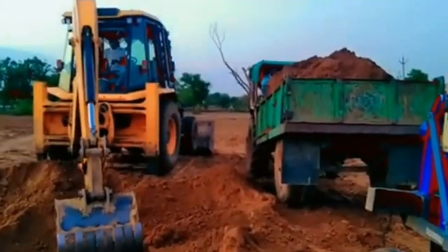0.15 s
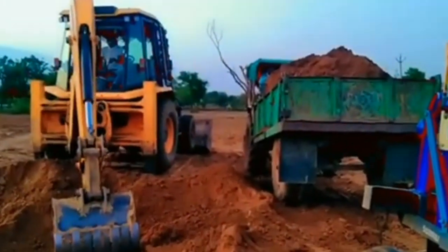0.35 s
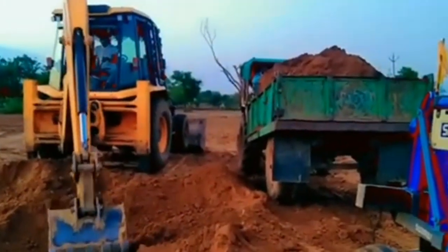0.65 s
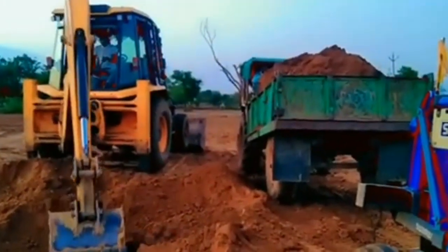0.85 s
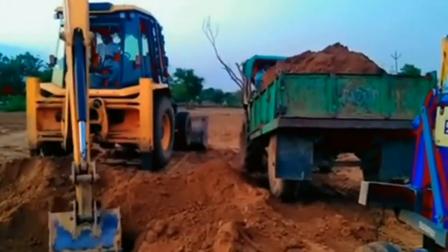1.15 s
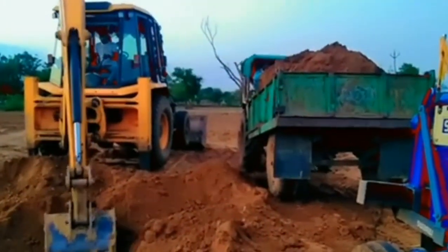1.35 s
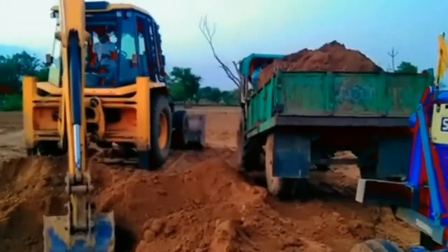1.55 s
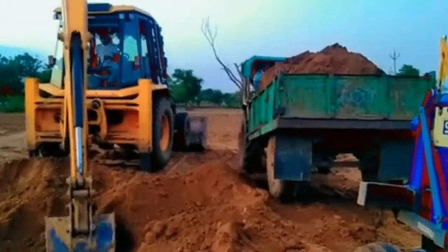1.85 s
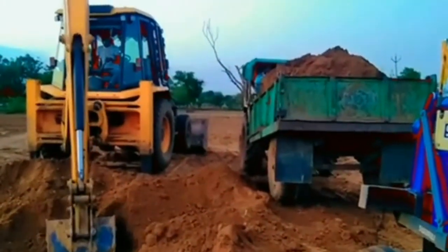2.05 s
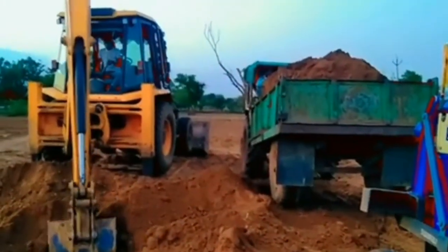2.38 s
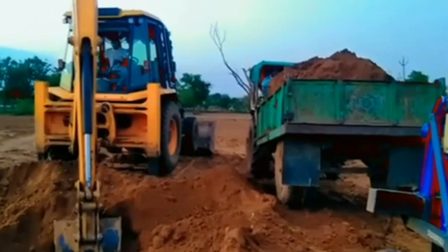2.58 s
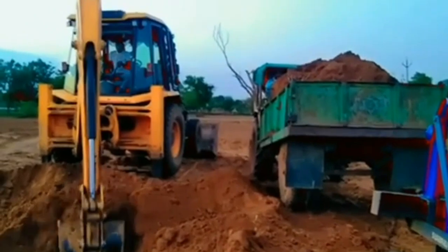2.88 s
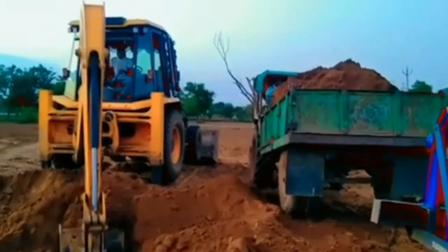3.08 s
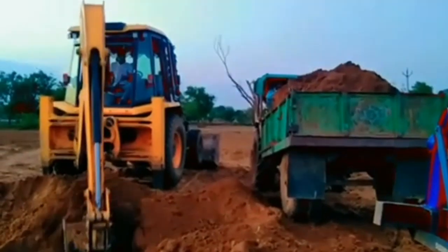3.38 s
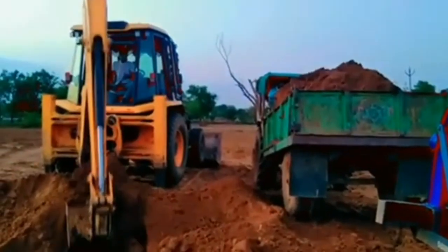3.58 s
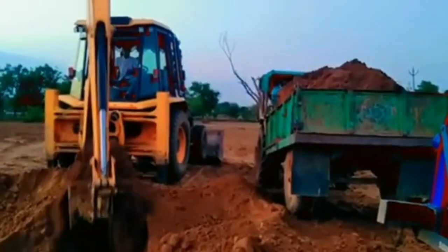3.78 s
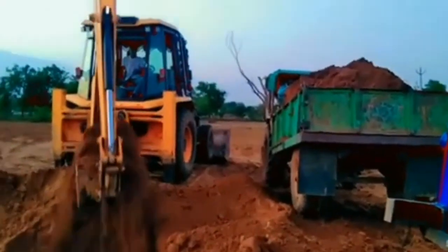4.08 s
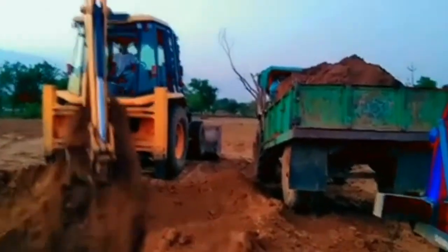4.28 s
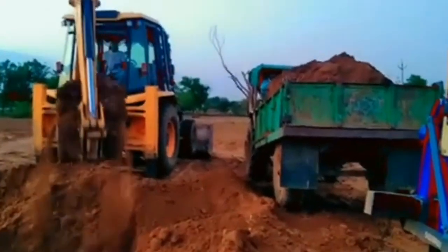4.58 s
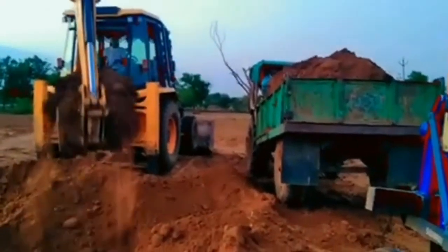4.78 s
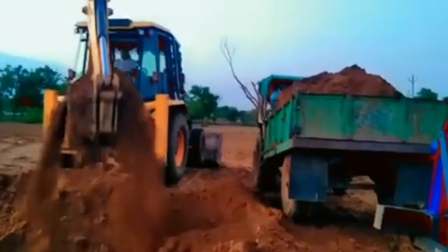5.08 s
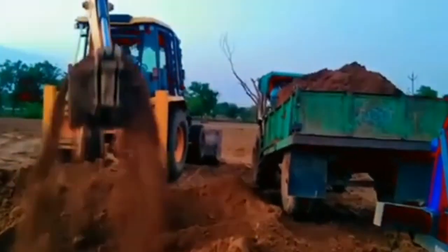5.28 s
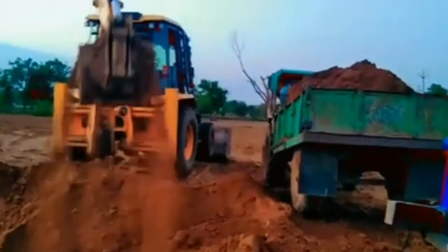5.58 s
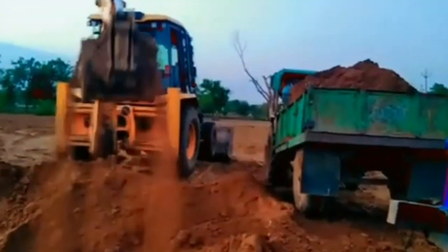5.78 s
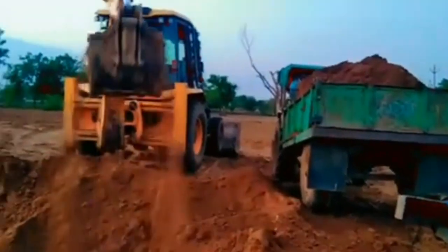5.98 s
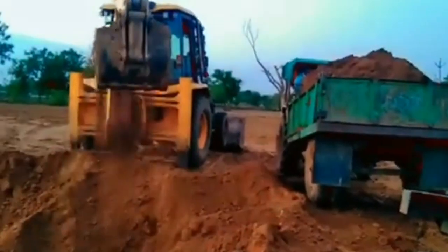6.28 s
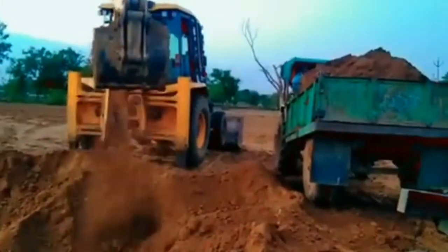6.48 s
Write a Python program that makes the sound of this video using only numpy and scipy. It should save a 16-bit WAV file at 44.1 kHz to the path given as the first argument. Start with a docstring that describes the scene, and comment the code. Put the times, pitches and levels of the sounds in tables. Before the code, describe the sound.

A diesel engine knocks at idle, revs up as a bucket bites dry earth, then stones snap and loaded steel bangs and rattles.

```python
"""A four-cylinder diesel knocks at idle, then revs up: a backhoe loader digs in dry earth in an open field.
Each firing shakes noise through block resonances, over the rushing noise of fan and exhaust.
Stones snap and squeal as the bucket curls: filtered impulses, grit grains and sliding narrow noise bands.
The hydraulics groan in rising rough overtones. Blows and rattle ring the lifted bucket's steel modes,
while spilling earth thuds as dull filtered grains and makes the shell boom."""
import sys
import numpy as np
from scipy import signal
from scipy.fft import rfft, irfft, next_fast_len
from scipy.io import wavfile

SR = 44100
rng = np.random.default_rng(int(sys.argv[2]) if len(sys.argv) > 2 else 0)


def dump(signal):
    """Clip the signal to [-1, 1] and save it as 16-bit WAV at the path in sys.argv[1]."""
    limited = np.clip(np.atleast_2d(signal).T, -1, 1)
    pcm = np.round(limited * 32767).astype(np.int16)
    wavfile.write(sys.argv[1], SR, pcm)


N = 292956
TIME = np.arange(N) / SR


def from_db(db):
    """Amplitude factor of a level in dB."""
    return 10 ** (np.asarray(db) / 20)


def rms_one(x):
    """Scale to rms 1."""
    return x / np.sqrt(np.mean(x ** 2) + 1e-20)


def in_time(rows):
    """Each column of a curve, at every sample."""
    s, *columns = np.transpose(rows)
    return [np.interp(TIME, s, c) for c in columns]


def noise():
    """White noise, rms 1."""
    return rng.standard_normal(N)


def drift(per_s):
    """Slow random variation, rms 1."""
    knots = rng.standard_normal(4096)
    return rms_one(np.interp(TIME * per_s, np.arange(len(knots)), knots))


def grains(per_s, spread_db):
    """Random contacts of uneven size; rms 1."""
    size_db = spread_db * np.minimum(rng.exponential(1, N), 4)
    sizes = from_db(size_db) * rng.choice([-1, 1], N)
    return rms_one(sizes * (rng.random(N) < per_s / SR))


def butterworth(x, order, edge_hz, kind="low"):
    """Butterworth filter."""
    return signal.sosfilt(signal.butter(order, edge_hz, kind, fs=SR, output="sos"), x)


def soften(x, edge_hz):
    """Steep low-pass: little is left above the edge."""
    return butterworth(x, 8, min(edge_hz, SR / 3))


def colour(x, spectrum):
    """Causal (minimum-phase) filter with the given spectrum; white noise keeps its level."""
    hz, db = np.transpose(spectrum)
    size = 2 * next_fast_len(N // 2 + 4096)
    grid_hz = np.maximum(np.arange(size // 2 + 1) * SR / size, 1)
    gain = rms_one(from_db(np.interp(np.log(grid_hz), np.log(hz), db)))
    # folding the cepstrum onto positive times makes the phase minimal
    cepstrum = irfft(np.log(gain))
    cepstrum[1:size // 2] *= 2
    cepstrum[size // 2 + 1:] = 0
    return irfft(rfft(x, size) * np.exp(rfft(cepstrum)))[:N]


def resonate(x, hz, width_hz):
    """One resonance with gain 1 on top."""
    r = np.exp(-np.pi * width_hz / SR)
    zeros = np.array([1, 0, -1]) * (1 - r * r) / 2
    poles = [1, -2 * r * np.cos(2 * np.pi * hz / SR), r * r]
    return signal.lfilter(zeros, poles, x)


def width_of(t60_s):
    """Bandwidth in Hz of a resonance that falls 60 dB in t60_s."""
    return np.log(1000) / (np.pi * t60_s)


def narrow_band(pitch_hz, width_hz, steady):
    """A rough tone on a moving pitch: a steady core with noise of a given width around it."""
    phase = 2 * np.pi * np.cumsum(pitch_hz) / SR
    in_phase = (steady + drift(width_hz)) * np.sin(phase)
    quadrature = drift(width_hz) * np.cos(phase)
    return rms_one(in_phase + quadrature)


def dying(start_s, decay_s):
    """A sudden start and an exponential decay."""
    return (TIME >= start_s) * np.exp(-np.abs(TIME - start_s) / decay_s)


def together(*levels):
    """Unrelated drives add in power."""
    return np.sqrt(sum(level ** 2 for level in levels))


def swells(rows, attack_s, release_s):
    """Each event rises to its level, holds and dies away; overlapping ones add in power."""
    power = 0
    for start_s, length_s, db, *_ in rows:
        rise = np.clip((TIME - start_s) / attack_s, 0, 1)
        fall = np.exp(-np.maximum(TIME - start_s - length_s, 0) / release_s)
        power = power + (from_db(db) * rise * fall) ** 2
    return np.sqrt(power)


# engine speed: (time [s], firing rate [1/s])
FIRING_RATE = [(0.0, 24.1), (0.4, 23.14), (1.45, 22.44), (2.3, 23.63), (2.6, 29.57), (3.2, 34.5),
               (3.5, 31.73), (3.8, 33.51), (4.3, 33.12), (5.4, 29.47), (6.64, 27.79)]
# engine effort, as strength of the combustion knock: (time [s], relative level [dB])
EFFORT_CURVE = [(0, -57.5), (.2, -56), (.55, -53), (.93, -52.5), (1.08, -56.5), (1.27, -52.5),
                (1.97, -52.5), (2.1, -61), (2.9, -55.5), (3.78, -51.5), (4.4, -52), (6.64, -58.5)]
# knock spectrum: (frequency [Hz], relative density [dB])
KNOCK_SPECTRUM = [(200, 0), (350, 2), (750, -9.5), (1050, 7), (1650, -12), (2100, 4.5), (2550, 0),
                  (3100, 2), (4000, -4), (4900, -5), (5700, -15), (7000, -36.5), (9500, -50.5)]
# ranges that ring with each firing: (frequency [Hz], width [Hz], relative level [dB])
FIRING_RINGS = [(1027, 290, -12.5), (2093, 126, 2), (2195, 85, 4.5), (3015, 220, -5), (3720, 580, -8.5)]
# fan and exhaust spectrum: (frequency [Hz], relative density [dB])
RUSH_SPECTRUM = [(200, 5.5), (290, 2.5), (480, -1.5), (780, -4), (1150, -7), (1700, -9.5), (2300, -7.5),
                 (3500, -2.5), (4900, -12), (5800, -22), (6800, -25.5), (8200, -38), (10000, -40),
                 (14000, -57)]
# block and panel resonances: (frequency [Hz], width [Hz], relative level [dB])
BLOCK_MODES = [(285, 73, -5.5), (334, 33, -9.5), (392.2, 4.5, 6.5), (977, 14, -5.5), (1184, 15, -6),
               (1730, 4, -2.5), (3128, 29, -1)]
# fine hiss pulsing at a fixed delay after each firing: (time [s], level [dB])
FINE_HISS = [(0, -93), (.55, -81), (2.25, -80.5), (2.53, -75.5), (2.68, -83.5), (3.9, -82), (4.4, -90)]
IDLE_FIRINGS_PER_S, RUSH_DB_AT_IDLE, RUSH_DB_PER_DOUBLING = 23, -53.5, 3.5
HISS_DELAY_S = .0395  # firing to strongest hiss


def engine(decay_turns=0.39, onset_turns=0.12, uneven_db=1.5, ring_uneven_db=1.0, block_db=9):
    """Every firing sets the block clattering for part of the cycle, over the rush of fan and exhaust."""
    (per_s,), (knock_db,), (hiss_db,) = in_time(FIRING_RATE), in_time(EFFORT_CURVE), in_time(FINE_HISS)
    rush_db = RUSH_DB_AT_IDLE + RUSH_DB_PER_DOUBLING * np.log2(per_s / IDLE_FIRINGS_PER_S)

    # one turn = one firing interval
    turn = np.cumsum(per_s) / SR - onset_turns + 1
    firing, since = turn.astype(int), turn % 1
    strength = from_db(uneven_db * rng.standard_normal(512)[firing])
    build_up = 1 - np.exp(-(since / .075) ** 2)
    burst = strength * build_up * np.exp(-since / decay_turns)

    jolts = from_db(knock_db) * rms_one(burst * grains(per_s=14000, spread_db=-1.5))
    knock = from_db(-4.0) * colour(jolts, KNOCK_SPECTRUM)
    rush = from_db(rush_db) * colour(noise(), RUSH_SPECTRUM)

    shaking = from_db(knock_db) * rms_one(burst * noise())
    rings = 0
    for hz, width_hz, db in FIRING_RINGS:
        # every firing shakes each range with a strength of its own
        drive = shaking * from_db(db + ring_uneven_db * rng.standard_normal(512)[firing])
        rings = rings + resonate(resonate(drive, hz, width_hz), hz, width_hz)

    steady = from_db(rush_db + 6.0) * noise()
    panels = sum(from_db(db) * resonate(steady, hz, width_hz) for hz, width_hz, db in BLOCK_MODES)
    body = from_db(block_db) * soften(panels + rings, edge_hz=6360)

    pulsed = np.cos(np.pi * (since - HISS_DELAY_S * per_s)) ** 2 * noise()
    hiss = from_db(hiss_db) * rms_one(butterworth(pulsed, 4, [5900, 8300], "band"))
    return knock + rush + body + hiss


# light metallic pings and ticks: (time [s], frequency [Hz], t60 [s], peak level [dB])
METAL_PINGS = [(.347, 2980, .05, -41.5), (.866, 7900, 0.0085, -54), (2.283, 4200, 0.059, -48),
               (5.784, 2070, 0.086, -29.5)]


def pings():
    """A small hard part is tapped and rings briefly at one pitch."""
    out = 0
    for s, hz, t60_s, db in METAL_PINGS:
        tone = np.sin(2 * np.pi * hz * (TIME - s))
        out = out + from_db(db) * dying(s, t60_s / np.log(1000)) * tone
    return out


# squeals of valves and of steel on stone:
# (time [s], length [s], start frequency [Hz], end frequency [Hz], level [dB])
SQUEAL_EVENTS = [(1.028, .21, 4200, 4000, -63), (4.461, 0.15, 2410, 2466, -46.5),
                 (4.567, 0.11, 2416, 2630, -50), (4.466, 0.24, 3820, 3800, -58),
                 (4.81, 0.17, 3080, 3050, -51.5), (5.17, 0.085, 3080, 3150, -46),
                 (5.2, 0.098, 3230, 3310, -53), (5.412, 0.17, 562, 629, -56), (5.43, 0.19, 2730, 2590, -53),
                 (5.48, 0.1, 3270, 3120, -49), (5.481, 0.11, 1070, 1100, -46)]


def squeals(width_hz=85):
    """One narrow resonance sings roughly for a moment, sliding a little."""
    out = np.zeros(N)
    for s, length_s, start_hz, end_hz, db in SQUEAL_EVENTS:
        done = np.clip((TIME - s) / length_s, 0, 1)
        pitch_hz = start_hz + (end_hz - start_hz) * done
        out += from_db(db) * np.sin(np.pi * done) * narrow_band(pitch_hz, width_hz, steady=0.55)
    return out


# bucket strokes on soil and stones: (start [s], length [s], relative level [dB])
SCRAPE_STROKES = [(3.25, 1, -51.5), (4.17, 0.22, -48.5), (4.45, 0.31, -48.5), (4.74, 0.15, -46),
                  (5.08, 0.14, -44), (5.37, 0.28, -37)]
# earth sliding off the bucket, also heard in booms(): (start [s], length [s], relative level [dB], boom [Hz])
EARTH_SLIDES = [(4.205, 0.16, -49.5, 365), (4.433, 0.16, -50, 358), (4.73, 0.25, -52.5, 335),
                (5.382, 0.11, -47, 388), (5.65, 0.22, -42, 292), (5.91, 0.043, -30.5, 298.3),
                (6.01, 0.26, -36, 374.4), (6.395, 0.16, -46, 286.8)]
# blows in bucket and linkage, also heard in bucket(): (time [s], relative level [dB], decay [s])
BLOWS = [(1.467, -48.5, 0.0084), (2.281, -49, 0.0083), (3.813, -43.5, 0.0054), (4.471, -44.5, 0.017),
         (5.371, -35, 0.016), (5.584, -32.5, 0.016), (5.597, -34, 0.012), (5.646, -36, 0.014),
         (5.686, -26.5, 0.009), (5.693, -29.5, 0.018), (5.751, -37, .007), (5.82, -40.5, 0.012),
         (5.841, -23, 0.012), (5.867, -32.5, 0.018), (5.89, -33, .018), (5.925, -34, 0.0085),
         (5.949, -32.5, 0.013), (5.964, -33.5, .012), (6.17, -37.5, 0.02), (6.211, -32.5, 0.024),
         (6.241, -35.5, 0.0067), (6.285, -35.5, 0.0073), (6.315, -35, 0.011), (6.381, -31.5, 0.0076),
         (6.441, -37.5, 0.012), (6.521, -34.5, 0.014), (6.584, -37, .018)]
SCRAPE_ATTACK_S, SCRAPE_RELEASE_S, SCRAPE_RUB_DB = 0.009, 0.062, -10
SPILL_ATTACK_S, SPILL_RELEASE_S, SPILL_RUB_DB = 0.011, 0.064, -10
# swung clear, the full bucket shudders; rub and trickle relative to the shudder
SHUDDER_START_S, SHUDDER_ATTACK_S, SHUDDER_DB = 5.575, 0.049, -34.5
SHUDDER_RUB_DB, SHUDDER_TRICKLE_DB = -1.5, -7
# loose pins rattle and the load shifts after each blow; relative to the blow
AFTER_RATTLE_DB, AFTER_RUB_DB, AFTER_DECAY_S = -3.5, -9.5, 0.1


def bucket_load():
    """How hard earth falls, soil rubs and steel rattles, from scrapes, slides, blows and shudder."""
    scrape = swells(SCRAPE_STROKES, SCRAPE_ATTACK_S, SCRAPE_RELEASE_S)
    spill = swells(EARTH_SLIDES, SPILL_ATTACK_S, SPILL_RELEASE_S)
    age_s = np.maximum(TIME - SHUDDER_START_S, 0)
    shudder = from_db(SHUDDER_DB) * np.minimum(age_s / SHUDDER_ATTACK_S, 1)
    shaken = together(*(from_db(db) * dying(s, AFTER_DECAY_S) for s, db, _ in BLOWS))
    earth = together(spill, from_db(SHUDDER_TRICKLE_DB) * shudder)
    rub = together(from_db(SCRAPE_RUB_DB) * scrape, from_db(SHUDDER_RUB_DB) * shudder,
                   from_db(AFTER_RUB_DB) * shaken, from_db(SPILL_RUB_DB) * spill)
    rattle = together(scrape, shudder, from_db(AFTER_RATTLE_DB) * shaken)
    return earth, rub, rattle


def clinks(force, per_s, t60_s, count=70):
    """Hard contacts each ring briefly at one of the shell's many close pitches."""
    contacts = force * grains(per_s, spread_db=3.5)
    dealt = rng.integers(0, count, N)
    pitches_hz = np.linspace(1300, 5100, count) + rng.uniform(-25, 25, count)
    width_hz = width_of(t60_s)
    out = np.zeros(N)
    for k, hz in enumerate(pitches_hz):
        out += resonate(contacts * (dealt == k) + 1e-18, hz, width_hz)
    return out * np.sqrt(SR / (np.pi * width_hz))


# bucket modes: (frequency [Hz], relative level [dB], t60 [s])
BUCKET_MODES = [(301, 1.5, .4), (389, 2.5, .45), (511, -3, .4), (900, -5, .2), (1066, -.5, .3),
                (1137, -5, .3), (1304, -5.5, .25), (2436, -2, .35), (2621, .5, .3), (2906, 0, .25),
                (2962, -3, .3), (3090, -5, .12), (3196, -.5, .3), (3656, -8, .25), (3820, -7, .3),
                (4296, -10, .2), (4619, -9, .25), (5270, -13, .2)]


def shell(earth, rub, force, ring_db=-15.0, contact_db=3):
    """Bucket modes: soft earth drives the low ones, rubbing the middle, hard contacts the high ones."""
    out = 0
    for hz, db, t60_s in BUCKET_MODES:
        width_hz = width_of(t60_s)
        level = earth if hz < 700 else rub if hz < 2000 else force
        # each mode comes and goes as the point of contact moves
        contact = from_db(contact_db * drift(per_s=14))
        drive = level * contact * resonate(noise(), hz, hz / 2)
        ring = resonate(drive, hz, width_hz) * np.sqrt(SR / (np.pi * width_hz))
        out = out + from_db(db + ring_db) * ring
    return soften(out, edge_hz=5200)


# heavy clods thumping on the shell: (time [s], relative level [dB])
CLOD_HITS = [(5.597, -35.5), (5.642, -31.5), (5.816, -30), (5.927, -35), (5.956, -30.5), (5.995, -40),
             (6.035, -43), (6.209, -33), (6.32, -43.5), (6.555, -36.5)]
CLOD_DECAY_S = 0.039
# spectra of steel, rubbing and falling earth: (frequency [Hz], relative density [dB])
STEEL_SPECTRUM = [(250, -4.5), (1200, -16), (1900, -8), (2500, -3), (3000, 5.5), (3450, 0.5), (4100, -2.5),
                  (4900, -7), (5330, -21), (5560, -23.5), (7000, -38), (10000, -71)]
RUB_SPECTRUM = [(250, 0.5), (550, -1.5), (750, -5), (920, 1.5), (1200, 3.5), (1700, -2), (2200, 1),
                (2800, 2), (5000, -21), (5700, -48), (10000, -64)]
EARTH_SPECTRUM = [(120, -5), (250, -3), (320, -3.5), (410, -4.5), (460, -18.5), (560, -8), (720, -20),
                  (1500, -38.5), (9000, -68.5)]


def bucket(rattle_db=-9, rub_db=-4.5, earth_db=-1.5, lumps_db=2.5, clink_db=-11.5, blow_body_db=-7):
    """Clods and loose pins batter the steel shell, which rings; spilled earth lands in dull thuds."""
    earth, rub, rattle = bucket_load()
    lumps = rms_one(from_db(lumps_db * drift(per_s=80)))
    blows = sum(from_db(db) * dying(s, decay_s) for s, db, decay_s in BLOWS)
    clods = together(*(from_db(db) * dying(s, CLOD_DECAY_S) for s, db in CLOD_HITS))
    loose = from_db(rattle_db) * rattle * lumps
    force = together(loose, blows)

    chatter = from_db(clink_db) * clinks(force, per_s=1000, t60_s=.075)
    jostle = soften(loose * grains(per_s=5000, spread_db=2.1), edge_hz=5000)
    steel = colour(blows * noise() + jostle + chatter, STEEL_SPECTRUM)

    pressure = together(from_db(rub_db) * rub * lumps, from_db(blow_body_db) * blows, clods)
    rubbing = colour(pressure * grains(per_s=3000, spread_db=0.0), RUB_SPECTRUM)
    thuds = colour(from_db(earth_db) * earth * grains(per_s=900, spread_db=-1.0), EARTH_SPECTRUM)
    return steel + rubbing + thuds + shell(earth, together(rub, clods), force)


# crunches of dry grit as the teeth bite: (time [s], level [dB])
GRIT_CRUNCHES = [(2.841, -54.5), (3.138, -51.5), (3.263, -54), (3.428, -56), (3.499, -51), (3.521, -50.5),
                 (3.558, -50.5), (3.811, -61), (4.211, -55)]
CRUNCH_DECAY_S = 0.017


def grit(centre_hz=3900, width_hz=2200, top_hz=8500):
    """Crushed grit gives short, bright showers of tiny cracks."""
    crush = together(*(from_db(db) * dying(s, CRUNCH_DECAY_S) for s, db in GRIT_CRUNCHES))
    cracks = grains(per_s=2400, spread_db=2)
    for _ in range(2):
        cracks = resonate(cracks, centre_hz, width_hz)
    return crush * rms_one(butterworth(cracks, 3, min(top_hz, SR / 3)))


# stones snapping under the teeth: (time [s], relative level [dB], top edge [Hz])
STONE_SNAPS = [(2.8419, -40, 6500), (3.1443, -39, 9000), (3.3169, -35, 4000), (3.3415, -30.5, 6000),
               (3.3578, -34.5, 6500), (3.4151, -38, 5000), (4.4285, -20, 5900), (5.013, -31.5, 9000),
               (5.045, -36, 5500), (5.1858, -20.5, 14000)]
# snap spectrum: (frequency [Hz], relative density [dB])
STONE_SPECTRUM = [(300, 10.5), (1500, -83), (2400, 2.5), (3700, 9.5), (4600, 1.5), (5650, -5), (6100, -11),
                  (9000, -26), (15000, -79)]


def stones(bounce_s=0.0025, bounce_db=-8, crumble_db=-21, crumble_s=0.004):
    """A stone gives one sharp snap, a weaker second one and a short crumble; harder stones reach higher."""
    force = np.zeros(N)
    age_s = TIME[:SR // 10]
    for s, db, top_hz in STONE_SNAPS:
        snap = from_db(crumble_db) * np.exp(-age_s / crumble_s) * rng.standard_normal(len(age_s)) / 2
        snap[0] += 1
        snap[round(bounce_s * SR)] += from_db(bounce_db)
        force[round(s * SR):][:len(age_s)] += from_db(db) * soften(snap, top_hz)
    unit_peak = np.abs(colour(signal.unit_impulse(N), STONE_SPECTRUM)).max()
    return colour(force, STONE_SPECTRUM) / unit_peak


BOOM_DB = -3.5  # relative to the slide


def booms(width_hz=55, upper_ratio=1.8, upper_db=-12):
    """Each slide booms the shell at a pitch set by where the load presses, with a weaker mode above."""
    out = 0
    for s, length_s, db, hz in EARTH_SLIDES:
        pitch_hz = np.full(N, hz)
        tone = narrow_band(pitch_hz, width_hz, steady=0.59)
        upper = from_db(upper_db) * narrow_band(upper_ratio * pitch_hz, width_hz, steady=.5)
        level = swells([(s, length_s, db + BOOM_DB)], SPILL_ATTACK_S, SPILL_RELEASE_S)
        out = out + level * (tone + upper)
    return out


# lift cylinder taking the load: (time [s], pitch [Hz], level [dB])
GROAN_CURVE = [(4.68, 140, -68), (4.85, 168, -55.5), (4.95, 182, -62), (5.11, 206, -57), (5.19, 235, -54),
               (5.26, 252, -56.5), (5.33, 256, -72)]
# groan overtones: (multiple of pitch [1], relative level [dB])
OVERTONES = [(3, -4), (4, -3), (5, 0), (6, -6), (7, -6)]


def groan(width_hz=48):
    """Oil under load gives a rough, rising stack of overtones."""
    pitch_hz, db = in_time(GROAN_CURVE)
    stack = sum(from_db(level_db) * narrow_band(k * pitch_hz, width_hz, steady=0.84)
                for k, level_db in OVERTONES)
    active = (TIME > GROAN_CURVE[0][0]) * (TIME < GROAN_CURVE[-1][0])
    return active * from_db(db) * rms_one(stack)


def scene():
    """The engine and the working bucket, heard from one spot."""
    machine = engine() + pings() + squeals() + bucket()
    digging = grit() + stones() + booms() + groan()
    return (machine + digging)[None]


CUTOFF_HZ = 15500


def record(dry, bass_cut_hz=259, leak_db=-34.0, hiss_db=-83.5, rumble_db=-93):
    """A small microphone that passes hardly any bass, with faint hiss and rumble and a steep top cut."""
    thin = butterworth(dry, 10, bass_cut_hz, "high")
    bass = from_db(leak_db) * butterworth(dry, 2, [78, 145], "band")
    hiss = from_db(hiss_db) * noise()
    rumble = from_db(rumble_db) * rms_one(butterworth(noise(), 2, 130))
    top_cut = signal.ellip(10, .1, 80, CUTOFF_HZ, fs=SR, output="sos")
    return signal.sosfilt(top_cut, thin + bass + hiss + rumble)


dry = scene()
out = record(dry)
dump(out)
```